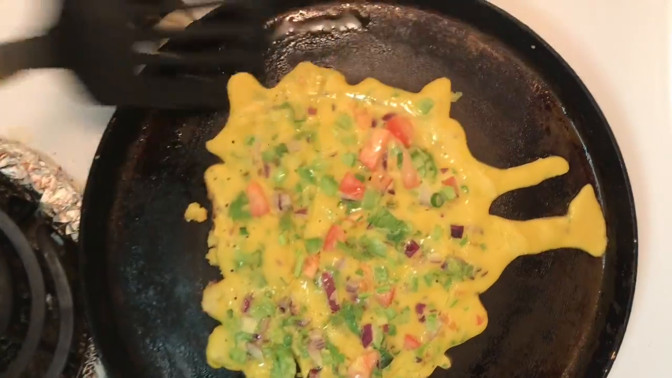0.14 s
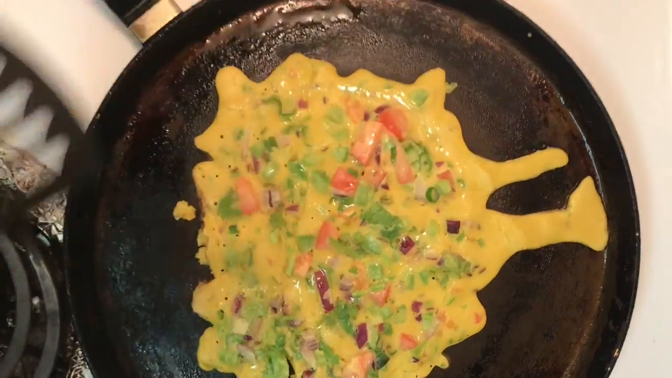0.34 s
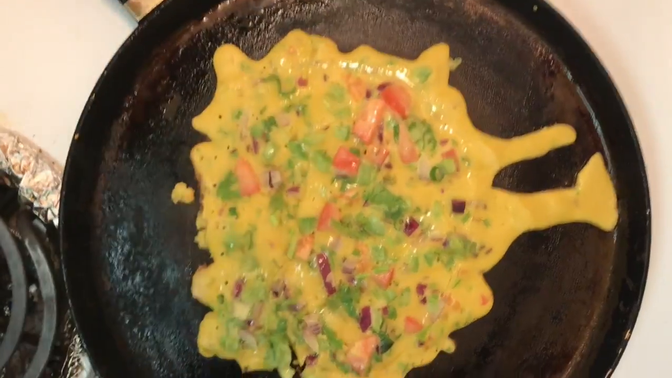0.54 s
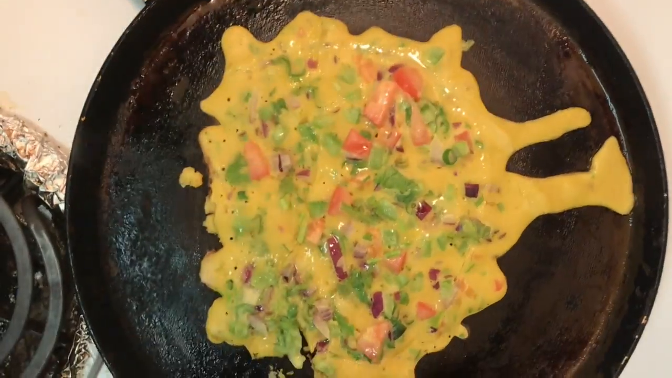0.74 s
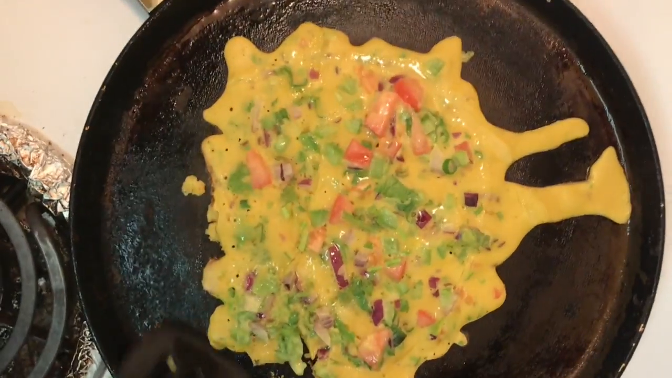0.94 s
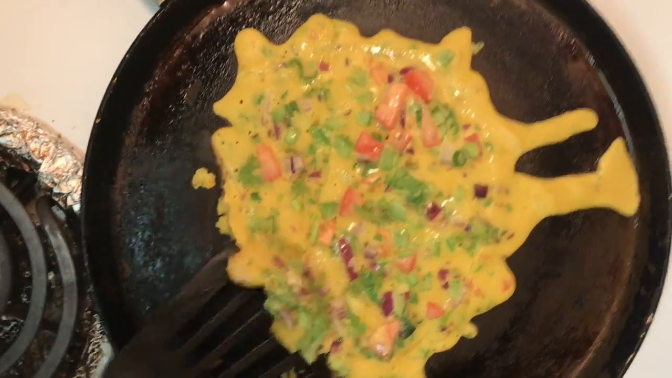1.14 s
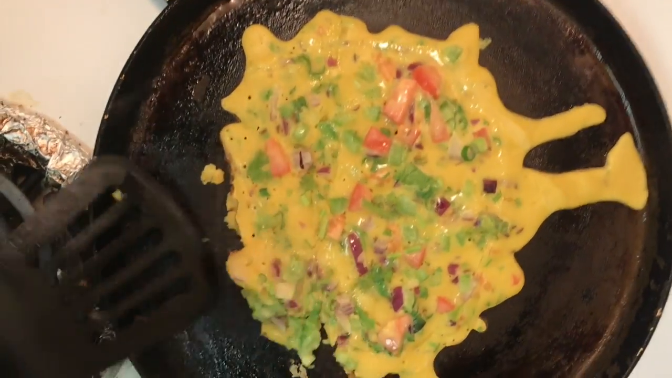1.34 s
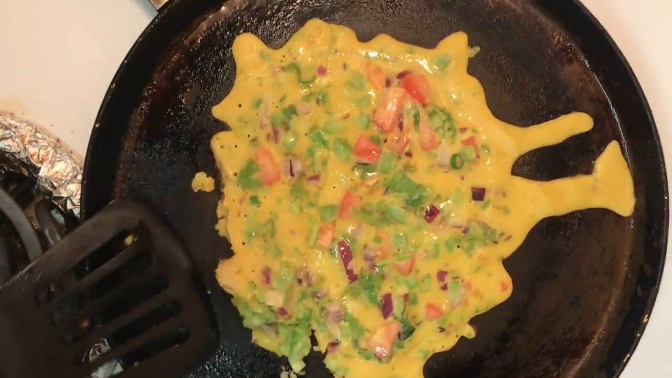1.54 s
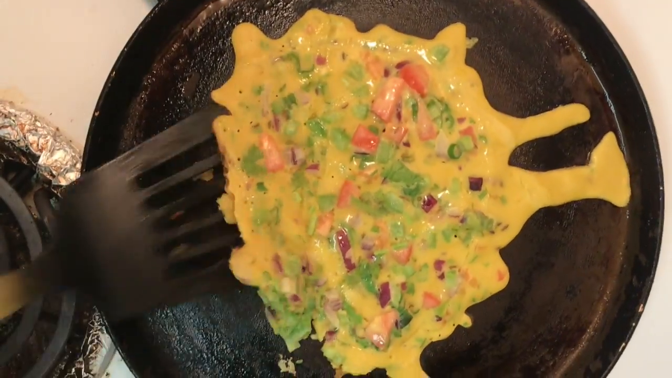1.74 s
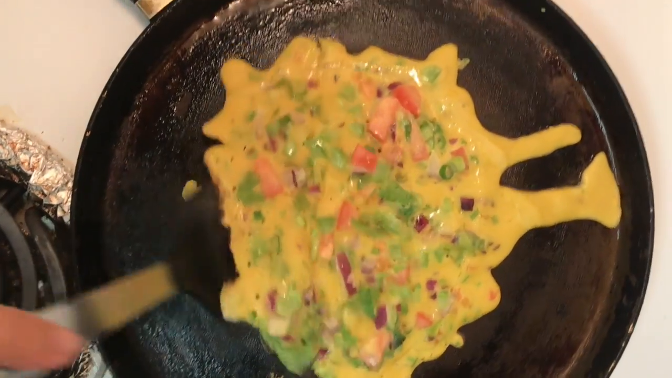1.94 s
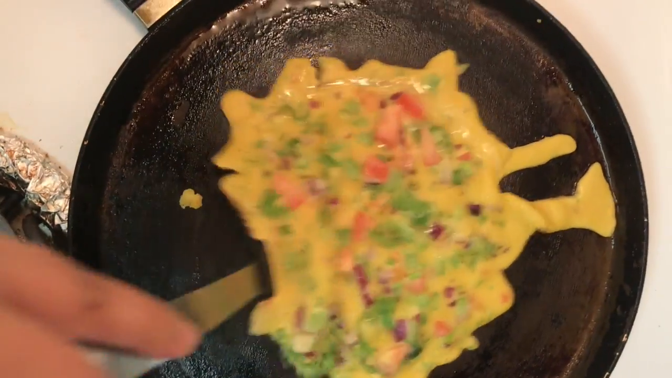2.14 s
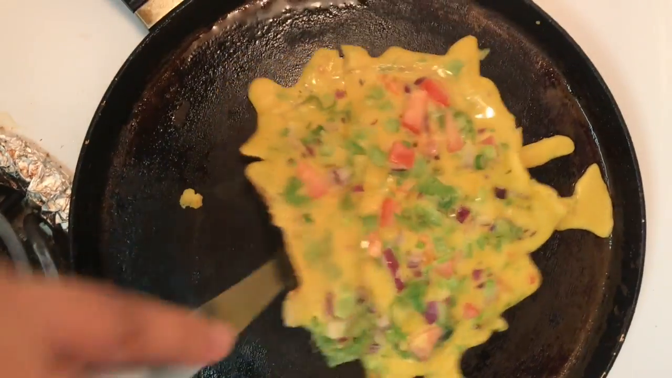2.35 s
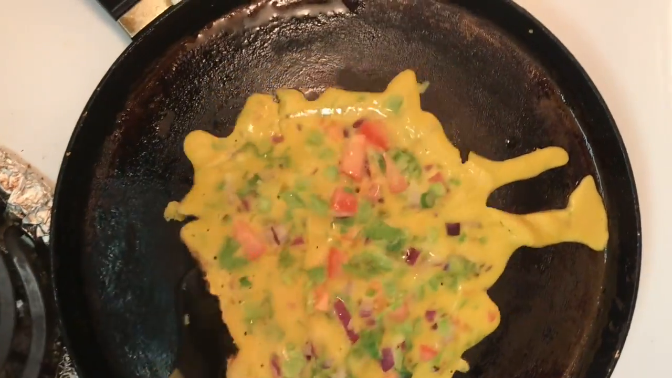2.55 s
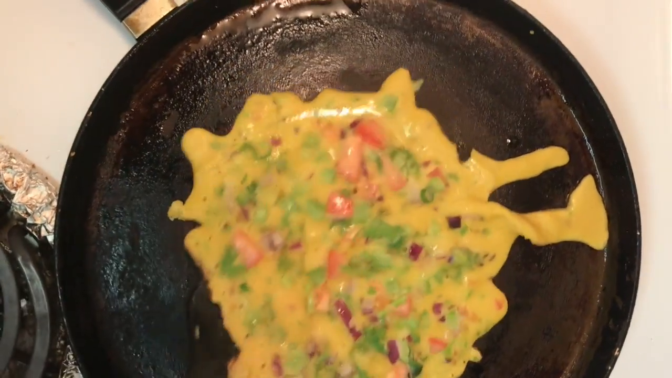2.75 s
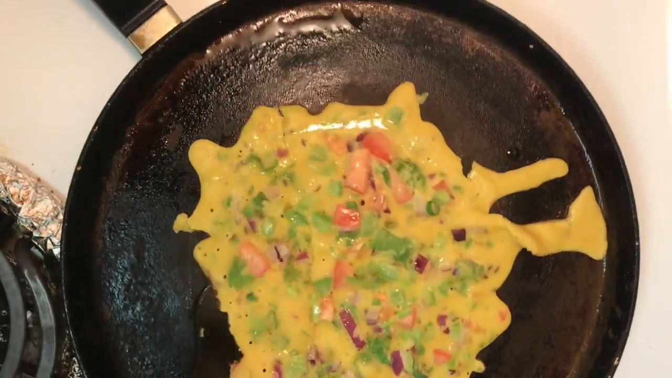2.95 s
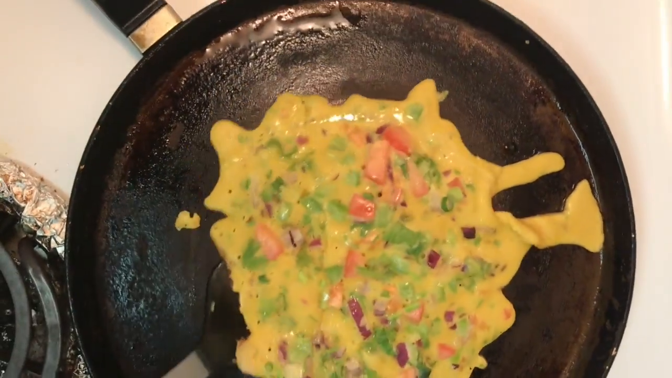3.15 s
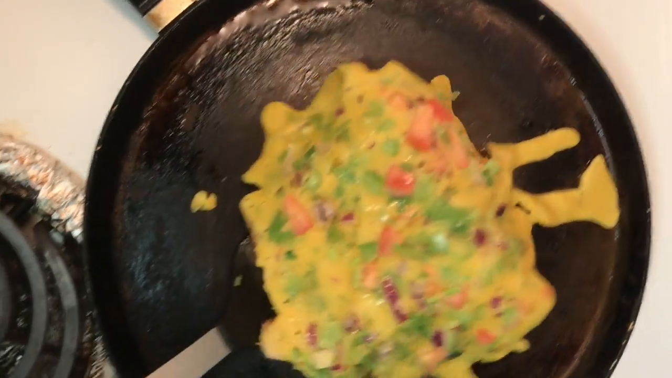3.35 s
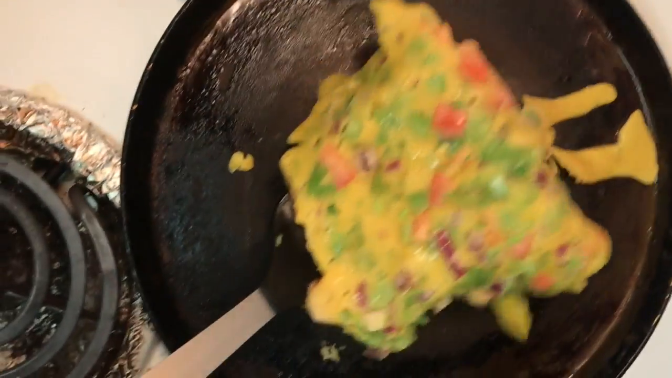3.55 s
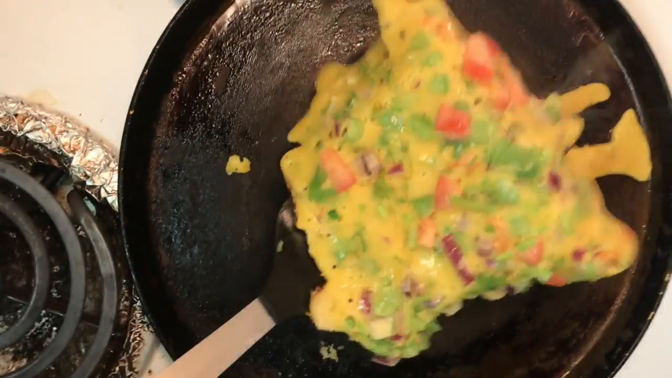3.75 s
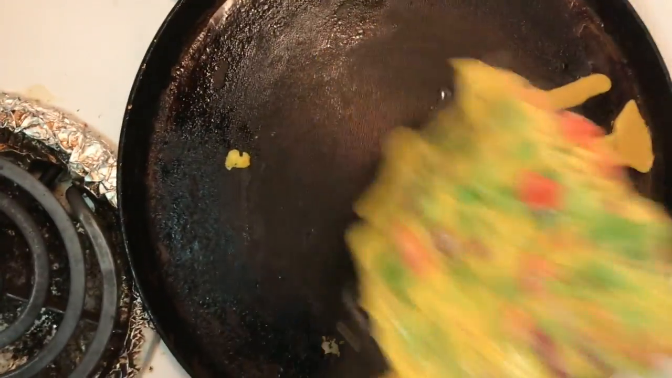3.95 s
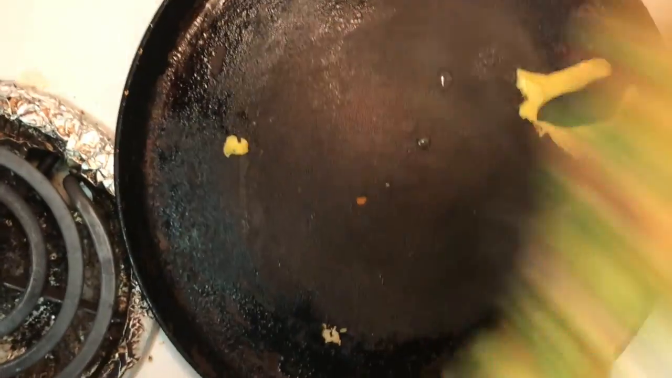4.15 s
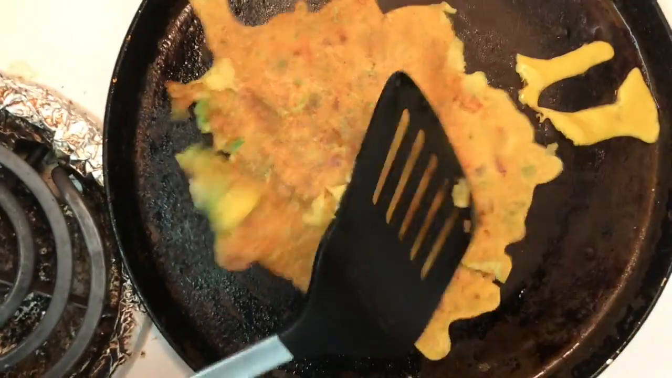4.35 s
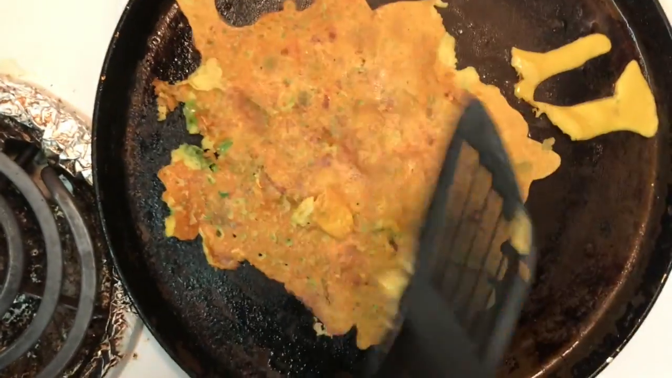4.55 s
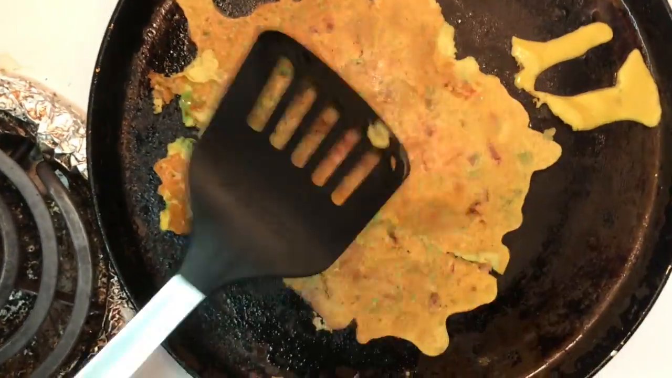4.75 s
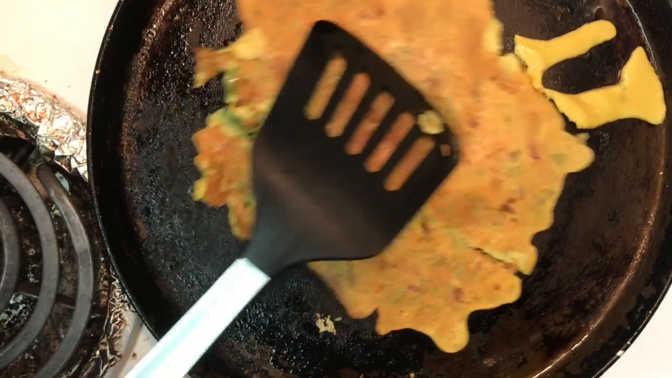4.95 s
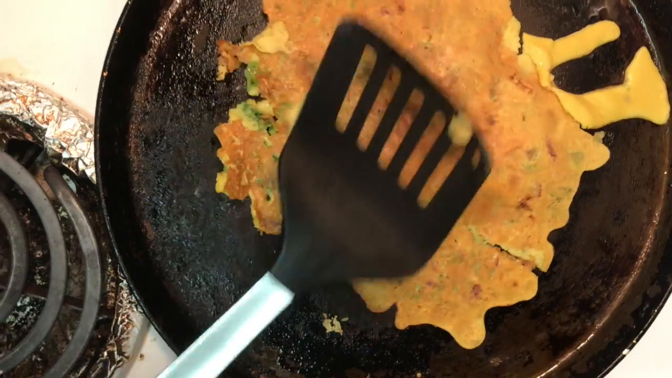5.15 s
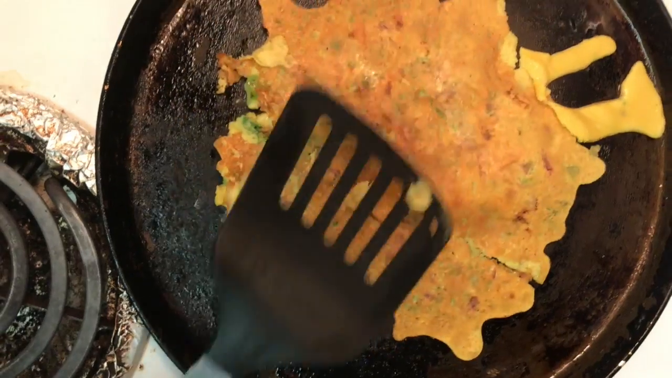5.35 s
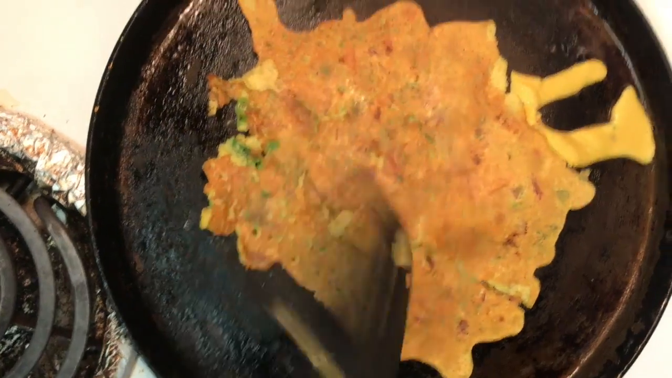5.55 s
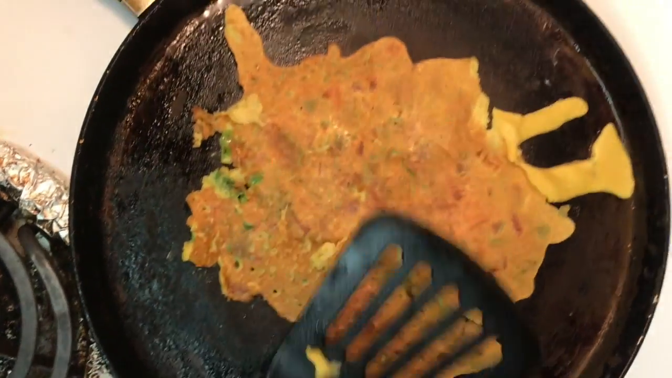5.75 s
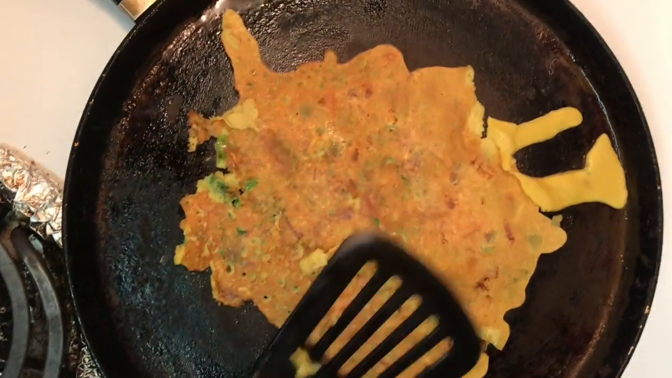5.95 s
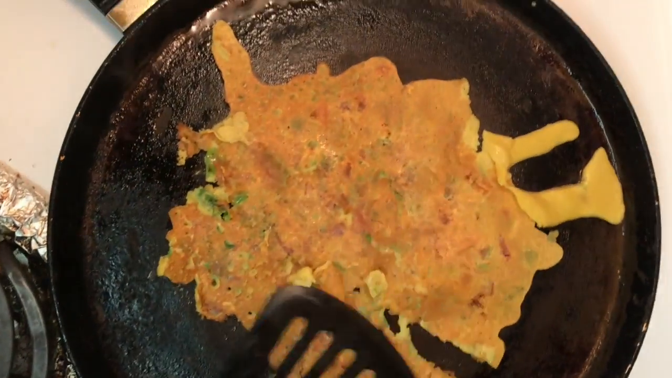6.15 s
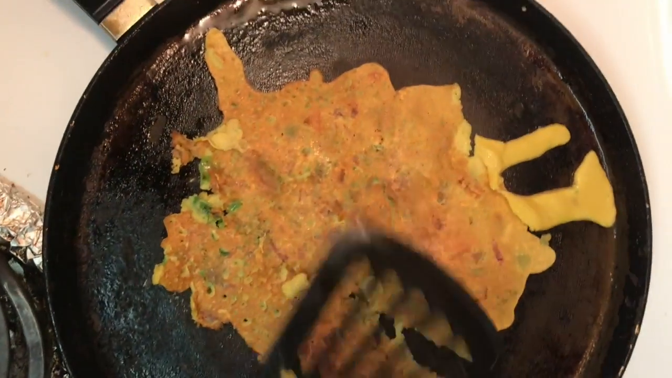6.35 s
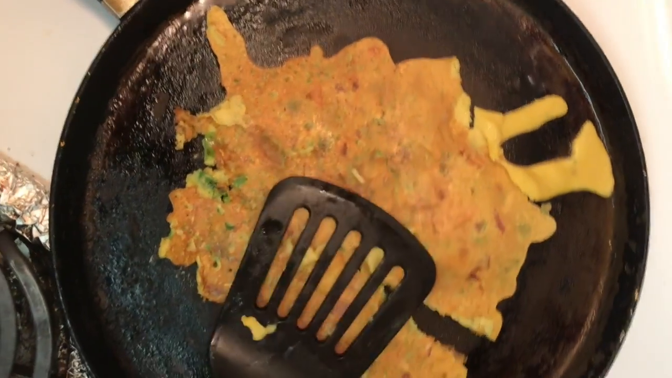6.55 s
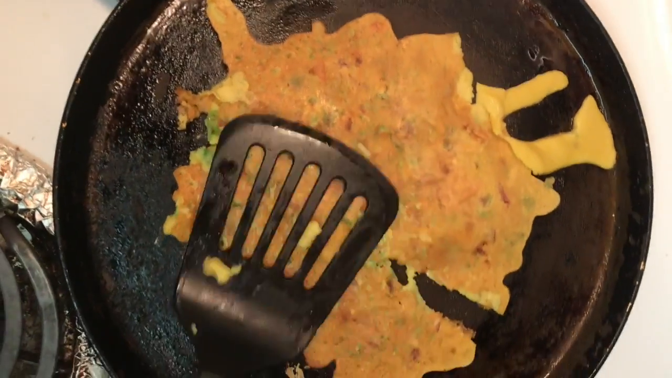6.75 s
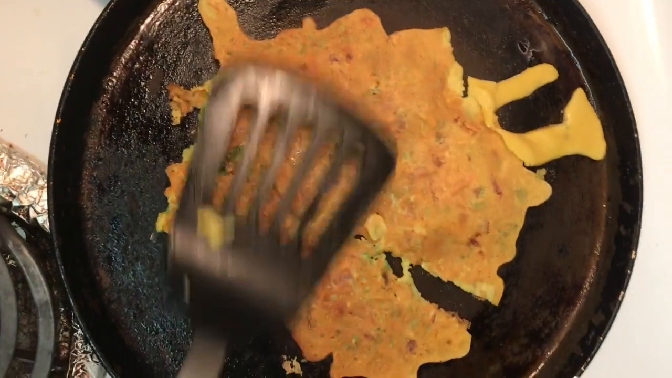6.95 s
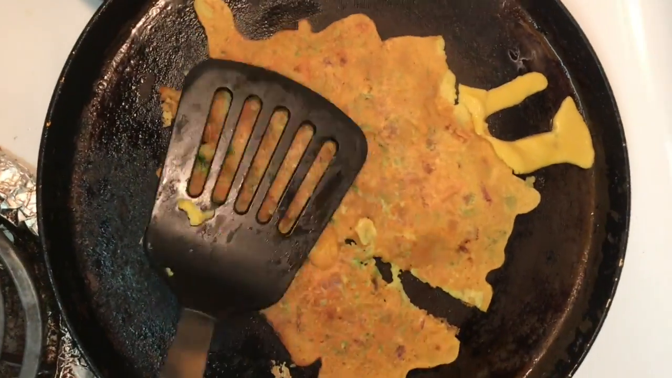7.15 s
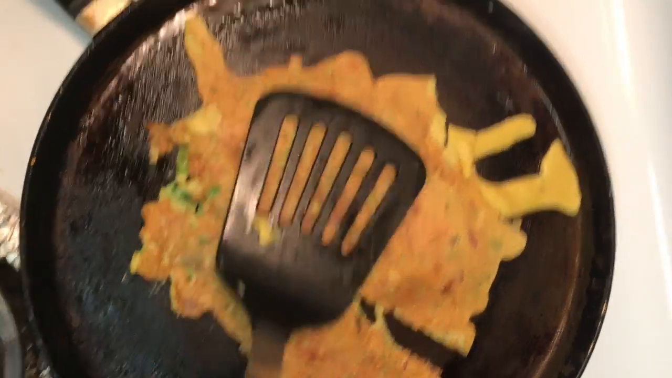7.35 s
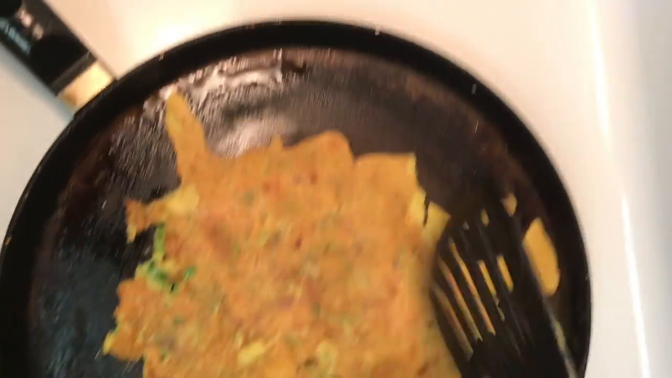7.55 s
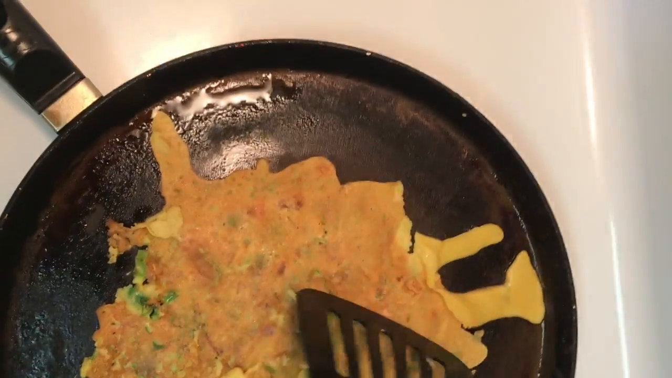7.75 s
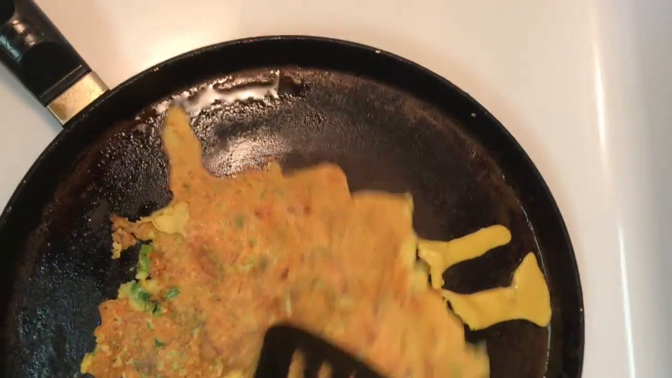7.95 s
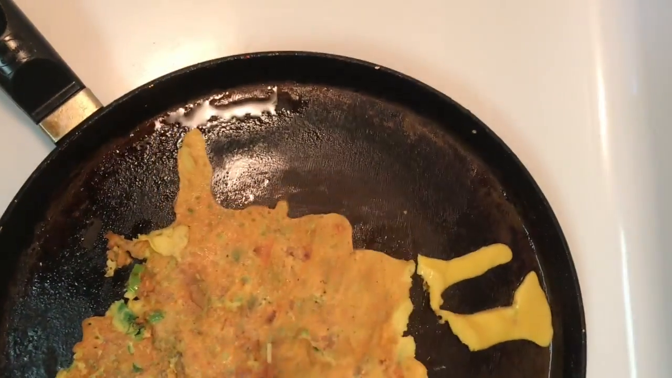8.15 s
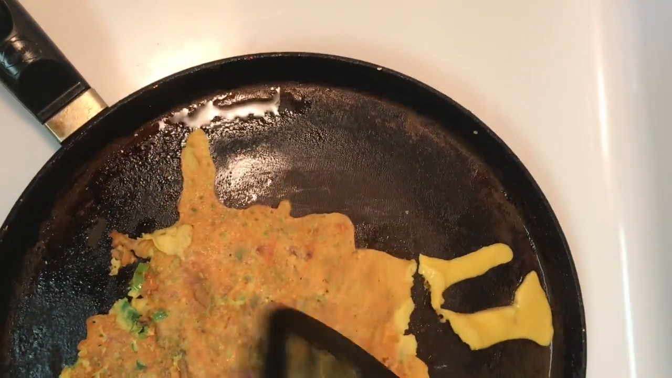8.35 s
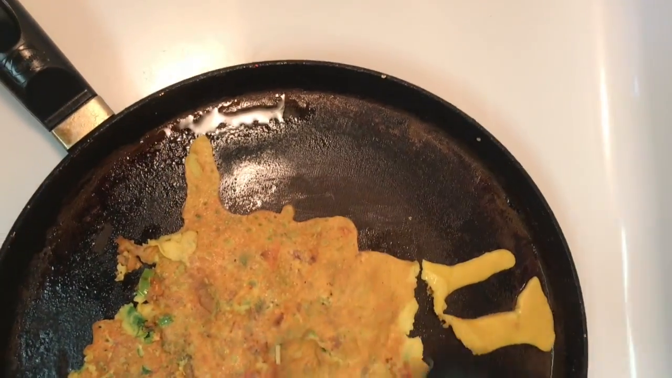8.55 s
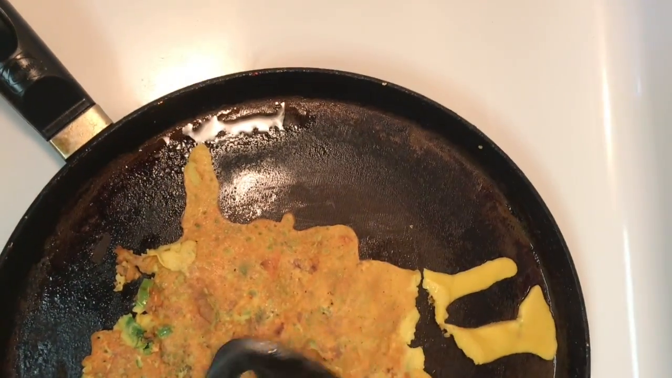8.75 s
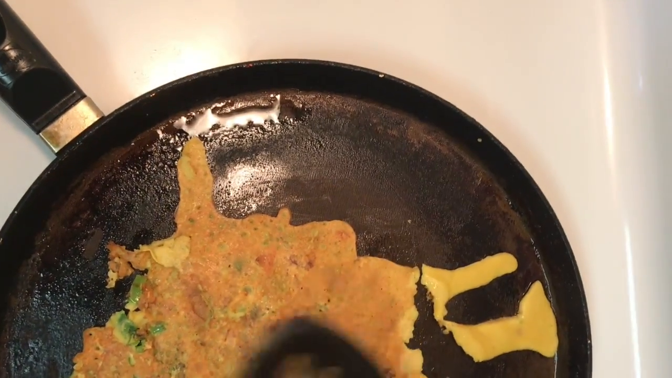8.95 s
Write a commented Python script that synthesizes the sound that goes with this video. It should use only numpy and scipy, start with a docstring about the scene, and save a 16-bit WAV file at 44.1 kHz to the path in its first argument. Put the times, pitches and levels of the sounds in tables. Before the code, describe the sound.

Close mono pickup with little room sound: soft frying, a quick metallic spatula swipe, short hollow scrapes and light clacks, and tiny oil ticks over low humming. Midway comes a hard, wet smack with a brief low rumble, then bright, crackling sizzle far louder than before. It fades unevenly, with strong pops, steam hisses, further scrapes and renewed flares.

```python
"""A vegetable pancake fries on an oiled griddle: clumped random bursts in three bands sizzle as steam bubbles.
Once turned, its wet side slaps down (noise-struck resonances) and sizzles loudly, with timed flares.
Oil pops, steam jets hiss, and a spatula scrapes, squeals and knocks by driving blade and griddle modes.
The griddle rumbles as it rocks on the ring; a kitchen appliance hums behind, as sines over coloured noise.
All is heard from close above, with the same signal in both channels."""
import sys
import numpy as np
from scipy import signal
from scipy.fft import rfft, irfft
from scipy.io import wavfile

SR = 44100
rng = np.random.default_rng(int(sys.argv[2]) if len(sys.argv) > 2 else 0)


def generate_wav(sig):
    """Save sig (samples, or channels by samples) to the path in sys.argv[1] as 16-bit PCM at SR."""
    pcm = np.round(np.clip(np.atleast_2d(sig).T, -1, 1) * 32767).astype(np.int16)
    wavfile.write(sys.argv[1], SR, pcm)


N = 396459
TIME = np.arange(N) / SR  # s

# bubble size ranges, coarse to fine: (low edge [Hz], high edge [Hz])
BUBBLE_BANDS = [(1150, 4800), (4800, 10400), (10400, 17000)]


def sizzle():
    """Boiling at a hot surface: the cooked side's thin frying yields at once to the wet side's."""
    # frying spectra: (frequency [Hz], relative spectral density [dB])
    dry_colour = [(900, -4.5), (1350, 1.5), (1800, -1), (2300, -0.5), (4200, 1), (4950, -1), (5900, 2),
                  (7650, -1), (8700, 2), (12500, 2), (15800, -1)]
    wet_colour = [(1000, -6), (1450, -5.5), (1850, -2), (2300, -2.5), (3400, -3.5), (4100, -2),
                  (4950, -2.5), (5550, 0.8), (6900, 2.5), (7650, -1.5), (9000, 2), (12000, -0.5),
                  (15800, -2.5)]
    # steady frying, before the trims below: (coarse [dB], medium [dB], fine [dB])
    dry_simmer_db = (-67, -63.5, -63)
    wet_simmer_db = (-51, -49.5, -48)
    landing_s, crossfade_s = 4.3675, 0.004
    landed = np.clip((TIME - landing_s) / crossfade_s, 0, 1)
    flares = flare_power()
    dry_side = frying(dry_simmer_db, flares, dry_colour, per_s=3800, spread_db=3.0, clump_db=0.7, snap_db=-5.0)
    wet_side = frying(wet_simmer_db, flares, wet_colour, per_s=7500, spread_db=3.0, clump_db=0.84, snap_db=-5.5)
    return (1 - landed) * from_db(0.37) * dry_side + landed * (from_db(0.3) * wet_side + trapped_steam())


def frying(simmer_db, flares, spectrum, per_s, spread_db, clump_db, snap_db):
    """Clustered shot noise: bubbles burst in clumps, each size in its band, with sharp snaps across all."""
    # fine bubbles snap more sharply: (coarse [dB], medium [dB], fine [dB])
    snap_tilt_db = (-3, 1.5, 4.5)
    shared_clumps = drift(24)
    snaps = grains(per_s / 10, spread_db)
    out = 0
    for (low, high), steady_db, flare, tilt_db in zip(BUBBLE_BANDS, simmer_db, flares, snap_tilt_db):
        clumping = from_db(clump_db * (shared_clumps + 0.71 * drift(23)))
        bursts = (grains(per_s, spread_db) + from_db(snap_db + tilt_db) * snaps) * clumping
        heard = colour(with_puffs(bursts, puff_db=-7.5, t60=.025), spectrum)
        level = np.sqrt(from_db(steady_db) ** 2 + flare)  # powers add
        out = out + level * rms_one(band(heard, low, high))
    return out


def flare_power():
    """Transient boiling: the power each flare adds swells, then decays as the moisture boils off."""
    # moisture meets hot oil as the pancake is moved or pressed:
    # (start [s], rise [s], amplitude decay to 1/e [s], coarse [dB], medium [dB], fine [dB])
    flare_rows = [(-.16, 0.3, 0.35, -53, -52, -51.5), (1.06, 0.072, 0.24, -54.5, -52, -52),
                  (1.365, 0.021, 0.43, -57.5, -53.5, -50.5), (1.72, 0.26, 0.088, -55.5, -54.5, -48.5),
                  (2.095, 0.055, 0.17, -59.5, -63, -53), (2.266, 0.067, 0.086, -51, -49, -49),
                  (2.826, 0.031, 0.46, -57, -55, -51.5), (3.13, 0.15, 0.092, -56.5, -51, -55),
                  (3.31, 0.058, 0.088, -69, -57, -52), (4.368, 0.098, 0.36, -42, -37.5, -35),
                  (4.83, 0.15, 0.41, -44, -38.5, -38), (5.471, 0.086, 1, -52.5, -46, -48.5),
                  (5.86, 0.16, 0.81, -51, -45, -48), (6.525, 0.034, 0.13, -44.5, -45.5, -58),
                  (6.785, 0.12, 0.25, -44.5, -40, -42), (7.113, 0.024, 0.23, -45.5, -41, -48),
                  (7.36, 0.055, 0.1, -44, -41.5, -41), (7.95, 0.11, 0.54, -44.5, -46, -42.5),
                  (8.77, 0.099, 0.15, -43.5, -47, -43)]
    power = np.zeros((len(BUBBLE_BANDS), N))
    for s, rise_s, decay_s, coarse_db, medium_db, fine_db in flare_rows:
        rise = np.clip((TIME - s) / rise_s, 0, 1)
        decay = np.exp(-np.maximum(TIME - s - rise_s, 0) / decay_s)
        power += np.outer(from_db([coarse_db, medium_db, fine_db]) ** 2, (rise * decay) ** 2)
    return power


def with_puffs(clicks, puff_db, t60):
    """Energy release: every burst lets out a decaying puff of steam in proportion to its size."""
    r = from_db(-120 / (t60 * SR))  # power, hence twice the decibels
    puff_power = signal.lfilter([1 - r], [1, -r], clicks ** 2 + 1e-18)
    return clicks + from_db(puff_db) * np.sqrt(puff_power) * rng.standard_normal(len(clicks))


def trapped_steam():
    """Cavity resonance: bubbles ring large and small steam pockets under the freshly turned pancake."""
    # pocket resonances, large then small: (frequency [Hz], width [Hz])
    pocket_modes = [(1820, 260), (4170, 700)]
    # how strongly they sing: (time [s], large pockets [dB], small pockets [dB])
    pocket_levels = [(4.37, -59, -64), (4.42, -50, -42), (4.7, -59, -48.5), (5.0, -48, -46),
                     (5.15, -54.5, -64), (6.7, -61, -74)]
    levels_db = in_time(pocket_levels, right=-120)
    out = 0
    for (hz, width), db in zip(pocket_modes, levels_db):
        ringing = resonance(resonance(grains(3000, 2.6), hz, width), hz, width * 2)
        out = out + from_db(db) * rms_one(ringing)
    return out


def squeezes():
    """Jet noise: steam forced out under the pressing blade hisses around one pitch at the pancake's edge."""
    # (centre time [s], level [dB], Gaussian half length [s], frequency [Hz])
    squeeze_rows = [(5.052, -48, .06, 6230), (6.595, -49, 0.044, 5850), (6.915, -45, 0.051, 5940),
                    (7.433, -54, 0.038, 6440)]
    jet = rng.standard_normal(N)
    return sum(swell(s, db, half_s) * rms_one(band(jet, hz * 0.906, hz / 0.95))
               for s, db, half_s, hz in squeeze_rows)


def pops(size=2048):
    """Impulse response: a big oil bubble snaps in about one cycle; a spitting steam jet hisses at one pitch."""
    # bursting bubbles, and at 0.665 s a small spatula tick heard only as its crack: (time [s], peak level [dB],
    # frequency [Hz])
    pop_rows = [(0.665, -34.5, 3900), (1.4645, -28, 13500), (1.549, -35, 9350), (1.9513, -28, 13000),
                (1.982, -34, 13500), (2.14, -32, 12500), (2.5677, -30.5, 11000), (3.7707, -39, 12400),
                (3.926, -27, 11500), (4.127, -36, 8490), (4.243, -35, 13500), (4.4675, -17, 12500),
                (4.528, -20, 6500), (4.6795, -14.5, 4800), (4.8215, -21, 8000), (4.8792, -20, 13500),
                (4.993, -19, 10500), (5.1315, -24, 6900), (5.6109, -25, 12500), (6.188, -12, 11600),
                (6.3562, -25, 11700), (6.447, -27, 7650), (7.967, -14.5, 3080), (7.9672, -20, 6500),
                (8.1915, -20, 10500), (8.4571, -22, 11700), (8.517, -20, 9970)]
    # steam jets through the oil: (time [s], peak level [dB], frequency [Hz], t60 [s])
    spit_rows = [(3.767, -44, 10500, .04), (3.912, -43, 8690, 0.021), (3.92, -42, 9400, 0.05),
                 (4.0505, -39.5, 7050, 0.046), (4.342, -43, 5300, .04), (4.419, -26, 4590, 0.03),
                 (6.031, -21.5, 7640, 0.013)]
    out = np.zeros(N)
    for s, db, hz in pop_rows:
        snap = with_puffs(signal.unit_impulse(size), puff_db=-5, t60=.028)
        add(out, s, from_db(db) * peak_one(band(snap, hz * .56, min(hz * 1.35, 15000))))
    for s, db, hz, t60 in spit_rows:
        add(out, s, from_db(db) * peak_one(resonance(burst(t60), hz, hz * 0.097)))
    return out


def smack():
    """Impact excitation: the wet side flops down twice and squeezes air out from under it."""
    # flops: (time [s], peak before the final band-pass [dB], force t60 [s])
    flop_rows = [(4.3668, -14.5, 0.039), (4.38, -23.5, 0.047)]
    # trapped air resonances: (frequency [Hz], width [Hz], gain [dB])
    smack_modes = [(680, 97, -5), (1150, 130, -7), (1280, 240, 1), (1780, 270, -9)]
    out = np.zeros(N)
    for s, peak_db, t60 in flop_rows:
        force = burst(t60)
        slap = sum(from_db(db) * resonance(force, hz, width) for hz, width, db in smack_modes)
        add(out, s, from_db(peak_db) * peak_one(slap))
    return band(out, 520, 2900)


def strokes():
    """Stick-slip friction: the blade jerks over crumbs and rings with the griddle; the crumbs grate."""
    # the blade pushed along under the pancake; its pitch depends on how it is held:
    # (start [s], length [s], level [dB], swell over the stroke [dB], blade [Hz], griddle ring [dB])
    stroke_rows = [(.835, 0.1, -58, 1, 570, -5), (0.985, 0.033, -53.5, -10, 640, -3),
                   (1.062, 0.027, -62, 0, 560, -14), (1.165, 0.053, -59, 5, 594, -22),
                   (1.492, 0.018, -56, 0, 635, -8), (1.572, 0.099, -61.5, -9, 640, -6),
                   (1.735, 0.11, -54.5, 3, 750, -12), (1.913, 0.11, -56.5, 7, 664, -1),
                   (2.029, 0.086, -56, 7, 673, -6.5), (2.23, 0.088, -56, 10, 690, 2),
                   (2.414, 0.089, -57, -5, 734, 2), (2.52, 0.042, -56, 9, 800, -3),
                   (2.647, 0.1, -64, -5, 760, 0), (2.84, 0.083, -62, 0, 720, 9),
                   (4.39, 0.1, -48.5, 5, 680, -2), (4.518, 0.069, -53, -7, 695, -9),
                   (4.638, .16, -60.5, -10, 716, 1), (4.858, 0.12, -51.5, 4, 735, 8),
                   (4.996, 0.27, -61, -9, 664, -17), (5.481, 0.03, -50.5, -1, 680, -5),
                   (5.565, 0.19, -55, 2, 682, -6), (5.966, 0.075, -53, -6, 765, 1),
                   (6.548, 0.12, -55.5, -4, 665, -15), (6.802, 0.2, -56.5, -6, 650, 6),
                   (7.126, 0.048, -49, -7, 656, 11), (7.267, 0.22, -57.5, -5, 654, -1),
                   (7.512, 0.19, -56, -14, 694, -1), (7.868, 0.17, -53, -4, 706, 1),
                   (8.446, 0.24, -57, -4, 790, -5), (8.822, .11, -52.5, -18, 690, -4)]
    release_t60_s = 0.18
    grip = catches(per_s=48, sag_db=8)
    drag = grains(1200, 1.6) * grip
    griddle = band(pan_body(grains(1100, 4.2) * grip), 540, 3000)
    grit = from_db(-21.0) * band(drag, 1120, 2460)
    out = np.zeros(N)
    for s, length_s, db, swell_db, hz, griddle_db in stroke_rows:
        span, gate, effort = stroke_shape(s, length_s, swell_db, release_t60_s)
        blade = blade_body(drag[span], hz, width_hz=65)
        ring = from_db(griddle_db) * griddle[span] + blade + grit[span]
        add(out, s, from_db(db) * gate * effort * rms_one(band(ring, 340, 3100)))
    return out


def catches(per_s, sag_db):
    """Relaxation oscillation: the blade slips at uneven intervals; its force sags until the next slip."""
    phase = np.cumsum(per_s * np.exp(.5 * drift(per_s))) / SR
    return from_db(-sag_db * (phase % 1))


def swipes():
    """Stick-slip squeal: fast strokes on bare metal; where the edge bites they rasp and the pitch drops."""
    # (start [s], length [s], squeal level [dB], swell [dB], free blade [Hz],
    #  bite time [s], rasp level [dB], blade after the bite [Hz])
    swipe_rows = [(.045, 0.215, -45, 7.5, 781, .212, -39, 658),
                  (0.996, 0.054, -49, 4, 555, 1.025, -52.5, 528),
                  (1.385, 0.043, -57, 13, 978, 1.428, -51, 630)]
    bite_s = 0.012  # time scale of the pitch drop
    rasp_fall_db_per_s = 190  # on either side of the bite
    release_t60_s = 0.12
    jitter, grip = 0.057 * drift(120), from_db(1.8 * drift(80))
    crumbs = grains(1800, 1.6) * from_db(2.0 * drift(70))
    out = np.zeros(N)
    for s, length_s, db, swell_db, free_hz, bite_time_s, rasp_db, loaded_hz in swipe_rows:
        span, gate, effort = stroke_shape(s, length_s, swell_db, release_t60_s)
        since_bite = TIME[span] - bite_time_s
        hz = free_hz + (loaded_hz - free_hz) * (1 + np.tanh(since_bite / bite_s)) / 2
        # one impulse for each completed cycle
        cycles = np.floor(np.cumsum(hz * (1 + jitter[span])) / SR)
        slips = rms_one(np.diff(cycles, prepend=0)) * grip[span]
        ring = rms_one(band(blade_body(0.34 * slips + crumbs[span], hz, width_hz=63), 490, 880))
        grit = from_db(-14.5) * band(crumbs[span], 770, 1680)
        rasp = rms_one(band(pan_body(crumbs[span]) + grit, 700, 3950))
        rasp_level = from_db(rasp_db - rasp_fall_db_per_s * np.abs(since_bite))
        add(out, s, gate * (from_db(db) * effort * ring + rasp_level * rasp))
    return out


def stroke_shape(s, length_s, swell_db, release_t60_s):
    """Force envelope: the samples covered, the gate (attack, hold, release) and the steady change of force."""
    attack_s = 0.013
    span = slice(round(s * SR), min(round((s + length_s + release_t60_s) * SR), N))
    t = TIME[span] - s
    release = 1000 ** (-np.maximum(t - length_s, 0) / release_t60_s)
    gate = np.clip(t / attack_s, 0, 1) * release
    return span, gate, from_db(swell_db * (np.minimum(t / length_s, 1) - .5))


def knocks():
    """Modal excitation: each contact is a brief judder with a surface crack, ringing modes and a dull thud."""
    # spatula knocks and the landing; crack and thud are peaks relative to the ring:
    # (time [s], peak level [dB], crack [dB], thud [dB], contact t60 [s], blade [Hz], crack [Hz])
    knock_rows = [(.804, -32.5, 5, -3, 0.079, 650, 3400), (.8355, -33, 3.5, -6.5, 0.032, 600, 2700),
                  (0.893, -40, -2, 2, .05, 580, 1500), (1.425, -35, 11, -18, 0.024, 700, 3400),
                  (1.4305, -34, -4, -17, .045, 653, 3100), (1.543, -39.5, -6, -15, 0.057, 650, 2400),
                  (1.728, -44, 2, -20, 0.034, 740, 1800), (2.384, -41, 1, -21, 0.066, 715, 1600),
                  (2.415, -41, -4, -21, 0.09, 730, 1300), (2.637, -38.5, 4, -22, .018, 790, 1620),
                  (2.8425, -42.5, 6, -20, .018, 730, 1500), (2.869, -38.5, 12, -28, 0.061, 715, 1590),
                  (2.905, -39.5, 5, -27, .025, 720, 1400), (4.3615, -21.5, -20, -21, 0.022, 710, 1500),
                  (4.3674, -15, 13, -10.5, .03, 640, 3800), (4.381, -23.5, 1, -8, 0.081, 670, 3000),
                  (4.394, -34, -10, -10, 0.084, 635, 1800), (4.418, -28.5, 3, -2, .08, 704, 1790),
                  (4.868, -36, 3, -15, .03, 750, 2500), (4.905, -39, -0.5, -10, 0.032, 770, 1800),
                  (5.564, -36, 4, -17, 0.015, 680, 2000), (5.612, -37, 4, -9, 0.011, 670, 1800),
                  (5.643, -37, 3, -18, .014, 820, 1800), (6.1508, -29, 6, -18, .025, 720, 3400),
                  (6.1545, -25.5, -1.5, -12, 0.022, 620, 2730), (6.163, -30.5, 2, -1, 0.094, 655, 1900),
                  (6.826, -35.5, 3, -19, 0.068, 667, 2500), (7.131, -37, 4, -4, 0.026, 640, 2000),
                  (7.388, -31.5, 9, -7, .04, 654, 2000), (7.451, -38, -8, -22, .024, 660, 2000),
                  (8.51, -33, 8, -24, 0.036, 800, 2500), (8.564, -41, -5, -21, 0.026, 760, 2500)]
    # crack spectrum: (frequency [Hz], relative spectral density [dB])
    crack_colour = [(500, -6), (1000, -1.5), (1700, 3), (2200, -6), (2800, 1), (4500, -5.5), (6500, -3.5),
                    (15000, -3.5)]
    press_in_s = 0.0015  # the ring builds up just after the crack, as the blade bears down
    out = np.zeros(N)
    for s, db, crack_db, thud_db, t60, hz, crack_hz in knock_rows:
        force = burst(t60)
        load = force * (1 - np.exp(-TIME[:len(force)] / press_in_s)) ** 2
        ring = band(pan_body(load) + blade_body(load, hz, width_hz=58), 420, 1050)
        crack = resonance(colour(force, crack_colour), crack_hz, crack_hz * 0.58)
        thud = band(resonance(load, 288, 40) + resonance(load, 427, 41), 190, 640)
        contact = peak_one(ring) + from_db(crack_db) * peak_one(crack) + from_db(thud_db) * peak_one(thud)
        add(out, s, from_db(db) * peak_one(contact))
    return out


def pan_body(force):
    """Modal superposition: the griddle's fixed resonances answer a force from the blade."""
    # (frequency [Hz], width [Hz], gain [dB])
    pan_modes = [(430, 40, -15), (563, 28, -5), (665, 45, -3), (790, 80, -5), (905, 70, -15),
                 (1140, 45, -6), (1320, 45, -7), (1500, 70, -7), (1840, 90, -8), (2080, 60, -13),
                 (2470, 110, -14), (2870, 130, -7), (3800, 130, -14), (4200, 400, -21)]
    return sum(from_db(db) * resonance(force, hz, width) for hz, width, db in pan_modes)


def blade_body(force, hz, width_hz):
    """Single-mode resonance: the blade rings at a steady or gliding pitch, by complex demodulation."""
    turn = np.exp(2j * np.pi * np.cumsum(hz * np.ones(len(force))) / SR)
    r = np.exp(-np.pi * width_hz / SR)
    return 2 * np.real(turn * signal.lfilter([1 - r], [1, -r], force / turn + 1e-18))


def rocking():
    """Low-frequency structure-borne noise: weight shifting on the griddle makes the stove top rumble."""
    # the griddle rocking on the ring: (centre time [s], level [dB], Gaussian half length [s])
    rocking_rows = [(0.903, -59, 0.085), (4.43, -41, 0.051), (4.53, -53, 0.036), (5.56, -52, 0.051),
                    (6.013, -50, 0.035), (6.192, -48, 0.039), (7.423, -55.5, 0.075), (8.882, -44, 0.047)]
    return sum(swell(*row) for row in rocking_rows) * rms_one(band(rng.standard_normal(N), 61, 101))


def appliance():
    """Tonal and broadband machine noise: slightly wavering mains hum over a low rush of air."""
    # hum partials: (frequency [Hz], mid rms level [dB])
    hum_partials = [(59.4, -52.5), (118.6, -59), (140, -70.5), (296, -68)]
    # air noise: (frequency [Hz], relative spectral density [dB])
    air_colour = [(24, -38), (38, 8.5), (55, 0.5), (85, 0.5), (125, 1.5), (165, -4.5), (215, -9), (280, 3),
                  (325, -8), (370, -2), (470, -14), (650, -8.5), (1000, -16.5), (1350, -20), (1800, -33.5),
                  (8000, -26)]
    hum = 0
    for hz, db in hum_partials:
        level = from_db(db + 0.69 * drift(2.3)) * np.sqrt(2)  # rms to peak
        hum = hum + level * np.sin(2 * np.pi * hz * TIME + 0.19 * drift(1.0))
    return hum + from_db(-56) * rms_one(colour(rng.standard_normal(N), air_colour))


def kitchen(x, room_db, room_t60):
    """Reverberation: the direct sound is followed by a faint, short, decaying tail."""
    tail = band(burst(room_t60), 210, 9500)
    delay = np.zeros(SR // 400)  # 2.5 ms
    return x + from_db(room_db) * signal.fftconvolve(x, np.r_[delay, tail / np.linalg.norm(tail)])[:N]


def from_db(db):
    """Logarithmic level: decibels to amplitude gain."""
    return 10 ** (np.asarray(db) / 20)


def rms_one(x):
    """Power normalization: scale to unit rms."""
    return x / np.sqrt(np.mean(x ** 2) + 1e-20)


def peak_one(x):
    """Peak normalization: scale to unit peak."""
    return x / np.abs(x).max()


def in_time(rows, **ends):
    """Linear interpolation: one curve for each column of a table that starts with times."""
    s, *columns = np.transpose(rows)
    return [np.interp(TIME, s, column, **ends) for column in columns]


def add(out, s, sound):
    """Superposition: mix a short sound in at s seconds."""
    start = round(s * SR)
    out[start:start + len(sound)] += sound[:N - start]


def band(x, low_hz, high_hz):
    """Band limiting: a gentle band-pass."""
    sos = signal.butter(2, [low_hz, min(high_hz, .45 * SR)], "band", fs=SR, output="sos")
    return signal.sosfilt(sos, x + 1e-18)


def resonance(x, hz, width_hz):
    """Damped oscillator: a two-pole resonance with gain 1 on top."""
    r = np.exp(-np.pi * width_hz / SR)
    zeros = np.array([1, 0, -1]) * (1 - r * r) / 2
    poles = [1, -2 * r * np.cos(2 * np.pi * hz / SR), r * r]
    return signal.lfilter(zeros, poles, x + 1e-18)


def colour(x, spectrum, size=8192):
    """Minimum-phase filtering: a causal filter, built by cepstral folding, follows a spectrum."""
    hz, db = np.transpose(spectrum)
    bins_hz = np.arange(size // 2 + 1) * SR / size
    gain = from_db(np.interp(np.log(bins_hz + 1), np.log(hz), db))
    cepstrum = irfft(np.log(gain))[:size // 2]
    cepstrum[1:] *= 2
    return signal.fftconvolve(x, irfft(np.exp(rfft(cepstrum, size))))[:len(x)]


def drift(per_s):
    """Low-passed noise: a slow random wander with unit rms."""
    hz = np.arange(N // 2 + 1) * SR / N
    return rms_one(irfft(rfft(rng.standard_normal(N)) / (1 + (hz / per_s) ** 2), N))


def grains(per_s, spread_db):
    """Shot noise: random clicks, many small and a few large, with unit rms."""
    sizes = from_db(spread_db * np.minimum(rng.exponential(1, N), 5.5)) * rng.choice([-1, 1], N)
    return rms_one(sizes * (rng.random(N) < per_s / SR))


def burst(t60, size=12000):
    """Exponential decay: a puff of noise that dies away."""
    return rng.standard_normal(size) * from_db(-60 * TIME[:size] / t60)


def swell(s, db, half_s):
    """Gaussian envelope: a smooth rise and fall around s seconds."""
    return from_db(db) * np.exp(-.5 * ((TIME - s) / half_s) ** 2)


def scene():
    """Superposition: every source reaches one microphone above the stove."""
    oil = kitchen(sizzle() + squeezes() + pops(), room_db=-14.5, room_t60=0.12)
    handling = kitchen(strokes() + swipes() + knocks() + smack(), room_db=-13.5, room_t60=0.29)
    return np.tile(oil + handling + rocking() + appliance(), (2, 1))


def record(dry):
    """Transducer response: the microphone dulls one narrow treble band; the top is cut steeply."""
    # (frequency [Hz], width [Hz], share removed at the centre [ratio])
    mic_dip = (10380, 490, 0.51)
    cutoff_hz = 15740
    hz, width_hz, share = mic_dip
    heard = dry - share * resonance(dry, hz, width_hz)
    return signal.sosfilt(signal.ellip(12, .1, 80, cutoff_hz, fs=SR, output="sos"), heard)


dry = scene()
out = record(dry)
generate_wav(out)
```